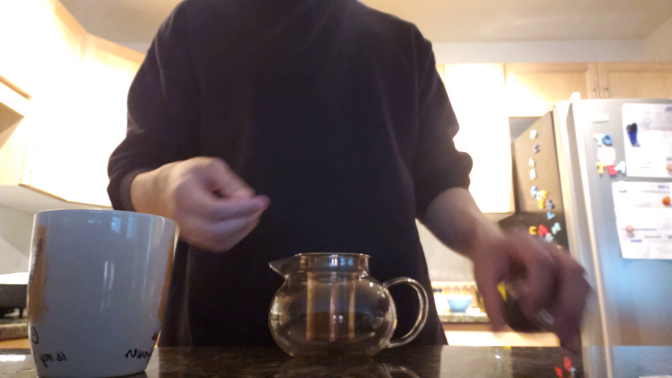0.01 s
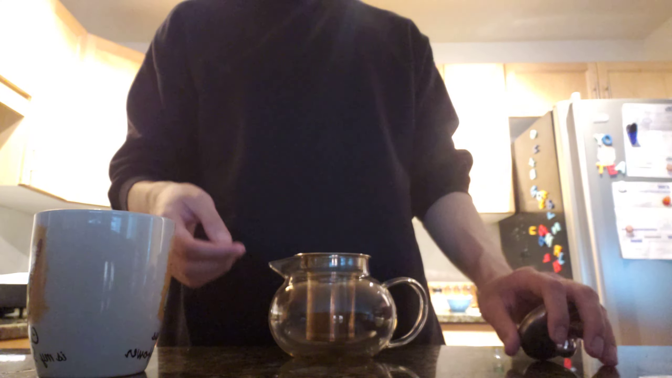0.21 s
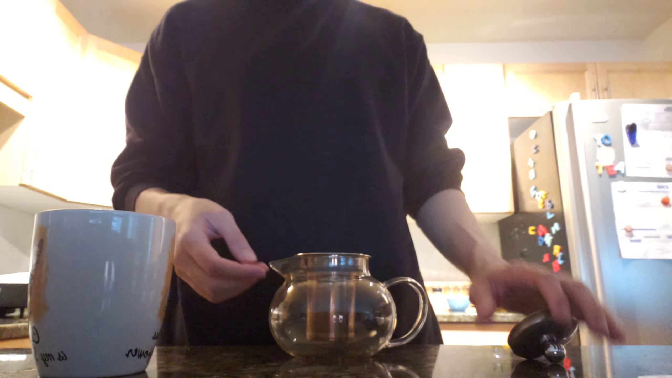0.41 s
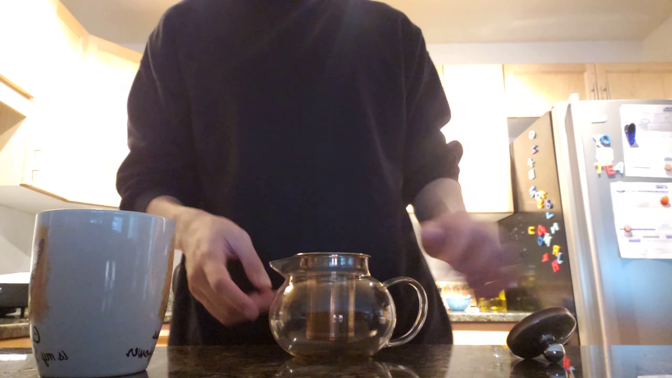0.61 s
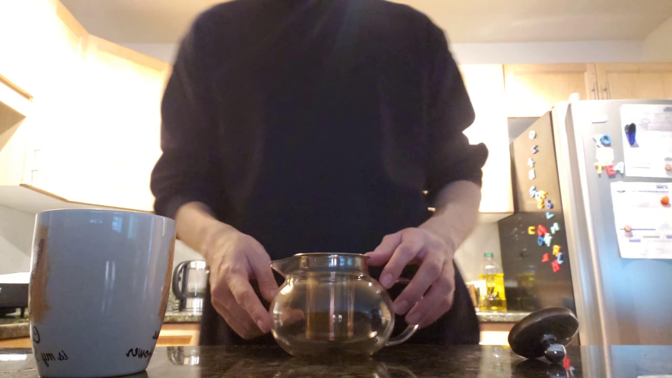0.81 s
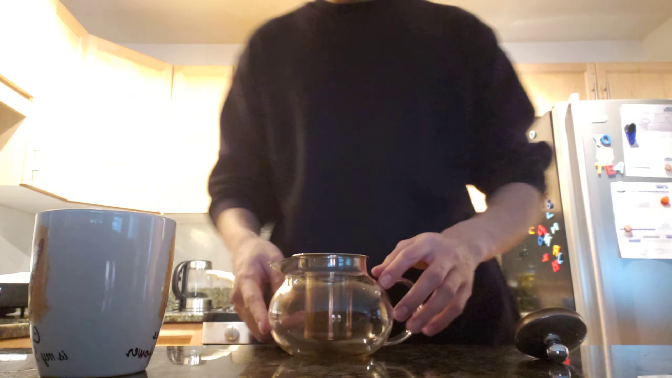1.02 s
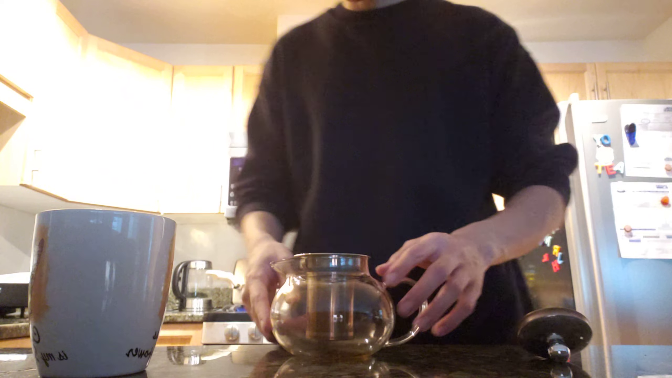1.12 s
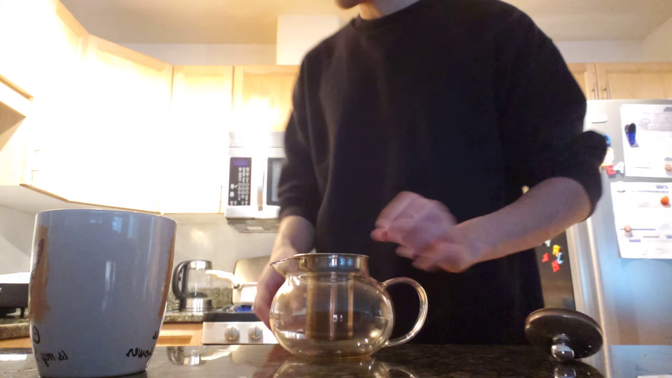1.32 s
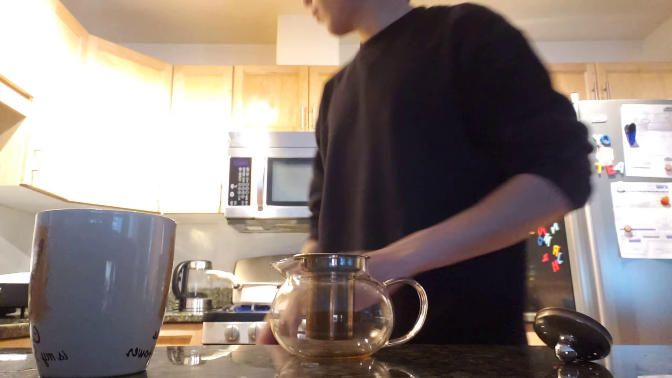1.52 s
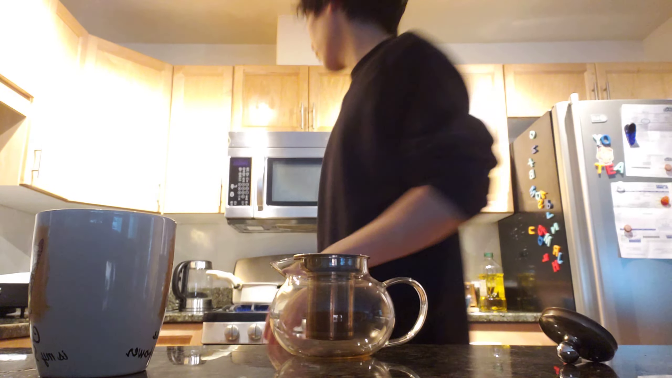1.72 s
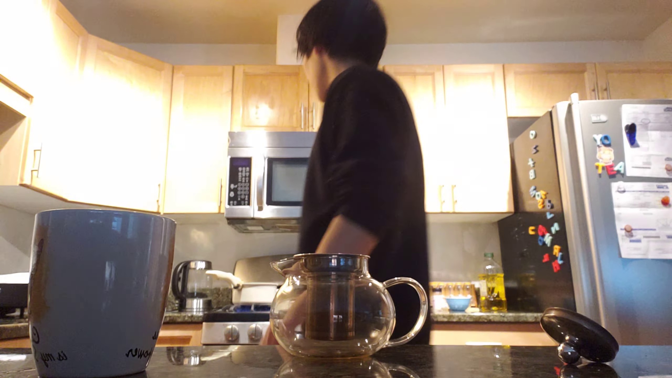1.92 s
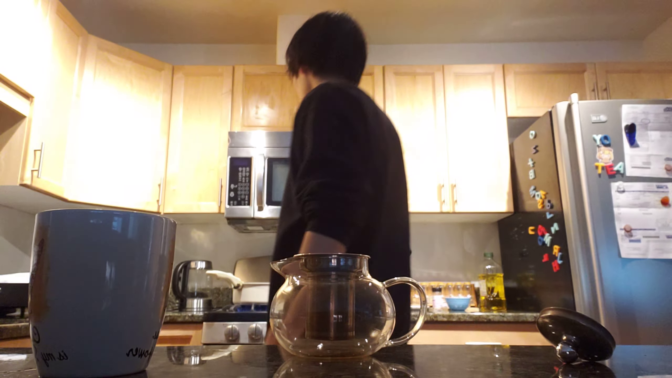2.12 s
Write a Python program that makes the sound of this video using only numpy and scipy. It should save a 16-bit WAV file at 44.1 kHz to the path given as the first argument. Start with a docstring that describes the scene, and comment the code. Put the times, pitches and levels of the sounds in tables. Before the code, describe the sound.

A teapot lid lands on a stone countertop, close to the microphone: a bright glass clink at 0.22 seconds, then a louder cluster of hard knocks and clinks at 0.36-0.38, with short kitchen reverberation and a faint rocking at 0.5. Much quieter footfalls and handling taps follow from 0.7, a dull heel thud at 0.92, and soft scuffs around 1.7-1.9, over a faint low appliance hum.

```python
"""Teapot lid on a stone countertop

A teapot lid is put down close by: its glass knob clinks, the rim knocks and chatters, and the lid
rocks to rest. Soft footfalls, scuffs and small handling taps follow as someone turns away, over a low hum.
Clinks and knocks are short clicks plus decaying tones; rocking, steps and taps are shaped noise, and one
heel also booms in decaying tones. The kitchen adds reverberation to the lid; the hum is noise plus tones."""
import sys
import numpy as np
from scipy import signal
from scipy.fft import rfft, irfft
from scipy.io import wavfile

SR = 44100
rng = np.random.default_rng(int(sys.argv[2]) if len(sys.argv) > 2 else 0)


def waveform_to_disk(signal):
    """Save audio, clipped to [-1, 1], as 16-bit WAV at the path in sys.argv[1]."""
    frames = np.transpose(np.atleast_2d(signal))
    scaled = np.clip(frames, -1, 1) * 32767
    samples = np.round(scaled).astype(np.int16)
    wavfile.write(sys.argv[1], SR, samples)


N = 97020  # length of the scene in samples
T = np.arange(N) / SR  # time [s]
HZ = np.fft.rfftfreq(2 * N, 1 / SR) + 1e-3  # frequency grid, nudged off zero so its log exists
NOISE_HZ = HZ[::2]  # coarser grid for sounds N samples long

LID_LAG_S, FAR_LAG_S = 0.00012, -.00029  # how far left arrives behind right
LID_PAN_DB, FAR_PAN_DB = 0.5, 3.5  # left minus right


def undb(db):
    """Turn decibels into gain."""
    return 10 ** (np.asarray(db) / 20)


def curve(points, hz=HZ):
    """Join (frequency, value) points by straight lines on a log-frequency axis."""
    p = np.array(points)
    return np.interp(np.log(hz), np.log(p[:, 0]), p[:, 1])


def pan(db):
    """Left and right gains that differ by this many decibels."""
    return undb(np.array([[db], [-db]]) / 2)


def fade(start, t60, rise):
    """Loudness that rises in a straight line, then loses 60 dB in every t60 seconds."""
    age = np.maximum(T - start, 0)
    decay = undb(-60 * np.maximum(age - rise, 0) / t60)
    return np.minimum(age / rise, 1) * decay


def ports(lag):
    """Phase turns that delay the left channel against the right."""
    return np.exp(-1j * np.pi * HZ * lag * np.array([[1], [-1]]))


def noise(gain, lag):
    """Stereo noise of unit rms with a given spectrum, more alike in both channels in the bass."""
    size = len(NOISE_HZ)
    z = rng.standard_normal((3, size)) + 1j * rng.standard_normal((3, size))
    alike = .92 / (1 + (NOISE_HZ / 1801) ** 2)  # shared part of the power
    shared = np.sqrt(alike) * z[0] * ports(lag)[:, ::2]
    separate = np.sqrt(1 - alike) * z[1:]
    x = irfft(gain[::2] * (shared + separate), N)
    return x / np.std(x)


def rub(spectrum, strokes, lag):
    """Noise that swells and fades with each (time, level, rise, t60) stroke; their powers add."""
    power = sum((undb(db) * fade(s, t60, rise)) ** 2 for s, db, rise, t60 in strokes)
    return noise(undb(curve(spectrum)), lag) * np.sqrt(power)


def click(points):
    """Spectrum of a unit-energy click: its energy comes as early as it can, then is faded fast."""
    # Folding the cepstrum forward in time makes the click start at once (minimum phase).
    cepstrum = irfft(np.log(undb(curve(points))))
    cepstrum[1:N] *= 2
    cepstrum[N + 1:] = 0
    click_t60_s = .004
    wave = irfft(np.exp(rfft(cepstrum)))[:N] * undb(-60 * T / click_t60_s)
    return rfft(wave / np.linalg.norm(wave), 2 * N)


def ring(modes):
    """Stereo spectrum of one second of decaying tones that build up while the surfaces touch."""
    contact_s = 0.00055
    t = T[:SR]
    onset = np.sin(np.pi / 2 * np.minimum(t / contact_s, 1)) ** 2
    tones = 0
    for hz, db, t60, side in modes:
        tones = tones + pan(side) * undb(db - 60 * t / t60) * np.sin(2 * np.pi * hz * t)
    return rfft(onset * tones, 2 * N)


def strike(response, blows, lag=LID_LAG_S):
    """Play a response at each (time, level) blow."""
    force = np.zeros(2 * N)
    for s, db in blows:
        force[int(s * SR)] += undb(db)
    return irfft(response * rfft(force) * ports(lag))[:, :N]


def knob():
    """Glass hitting stone: a tick, high ringing tones and a short bright splash of noise."""
    # Knob on stone: (time [s], level [dB], level of the bright splash [dB])
    clinks = [(.2234, -0.5, -31.5), (.3697, -3.5, -28), (.3762, -0.5, -28.5), (.3835, -6.5, -37)]
    # Ringing of the knob: (frequency [Hz], amplitude against the clink [dB], t60 [s], left minus right [dB])
    knob_modes = [(890, -55, .1, 3), (1350, -48, .025, 3), (1780, -43, .03, 5), (2790, -41, .025, 8),
                  (4225, -27, .035, -7), (4850, -23, .012, 2), (5230, -30, .025, 0), (10700, -19, .045, -5),
                  (11150, -25, .025, 0), (11590, -23, .04, -3), (10695, -27, .14, -2), (10845, -31, .16, 0),
                  (11540, -35, .16, 2), (12905, -40, .12, 6), (13730, -36, .11, 7), (14530, -36, .1, 6)]
    # Colour of the tick and splash: (frequency [Hz], relative level [dB])
    splash_colour = [(60, -40.5), (600, -22.5), (1800, -13.5), (3400, -9.5), (5200, -2), (6700, -12.5),
                     (7800, -17.5), (10000, -20.5), (10900, 5), (12200, -1.5), (14000, -1.5), (15500, -18)]
    tick_db, splash_t60_s, splash_pan_db = -9.5, .05, 11
    response = ring(knob_modes) + undb(tick_db) * click(splash_colour)
    clinking = strike(response, [(s, db) for s, db, _ in clinks])
    bursts = [(s, db, 1e-4, splash_t60_s) for s, _, db in clinks]
    return clinking + pan(splash_pan_db) * rub(splash_colour, bursts, LID_LAG_S)


def rim():
    """Each bounce of the rim cracks, shakes the counter as a burst of noise and rings the lid."""
    # Rim on stone: (time [s], crack level [dB], ring level [dB])
    knocks = [(.3609, -4, 0.5), (.368, -3, -12), (.3729, -10.5, -13), (.378, -9.5, -19),
              (.3838, -12.5, -20)]
    # Ringing of the lid: (frequency [Hz], amplitude against the ring level [dB], t60 [s], left minus right [dB])
    rim_modes = [(881.4, -30, 0.24, 4), (990, -31.5, 0.076, 2.5), (1260, -43, .12, 2), (1643, -35, 0.16, 3),
                 (1888, -33.5, .13, 4), (1985, -36.5, .08, 10.5), (2422, -37.5, 0.098, 2),
                 (2518, -40.5, 0.076, 4.5), (4230, -28.5, .1, 5), (4268, -10.5, 0.034, -10.5)]
    # Colour of the crack and counter: (frequency [Hz], relative level [dB])
    crack_colour = [(30, -43.5), (70, -33.5), (150, -22), (300, -3.5), (700, -2), (1900, 3), (2600, 6.5),
                    (3400, -18), (5200, -16), (7500, -29.5), (10000, -33.5), (14000, -31), (16000, -46.5)]
    body_db, body_t60_s = -27, 0.093  # counter noise; its level is against the crack level
    crack = strike(click(crack_colour), [(s, db) for s, db, _ in knocks])
    shakes = [(s, db, 1e-4, body_t60_s) for s, db, _ in knocks]
    body = undb(body_db) * rub(crack_colour, shakes, LID_LAG_S)
    ringing = strike(ring(rim_modes), [(s, db) for s, _, db in knocks])
    return pan(LID_PAN_DB) * (crack + body) + ringing


def rocking():
    """The lid rocks to rest: one soft swell of noise that fades."""
    # Rocking: (time [s], level [dB], rise [s], t60 [s])
    rocks = [(0.496, -50.5, 0.0306, 0.15)]
    # Colour of the rocking: (frequency [Hz], relative level [dB])
    rock_colour = [(100, -26), (300, -1.5), (600, 3.5), (900, 7.5), (1900, -11), (3000, -14), (7000, -26.5)]
    return pan(LID_PAN_DB) * rub(rock_colour, rocks, LID_LAG_S)


def steps():
    """Thuds of soft-edged noise, one firm heel that makes the floor boom, and soles that scuff."""
    # Footfalls: (time [s], level [dB], rise [s], t60 [s], upper edge [Hz])
    footfalls = [(0.686, -56, 0.007, 0.56, 390), (.87, -55, 0.0052, 0.36, 346),
                 (0.913, -47.5, 0.0053, 0.31, 310), (1.019, -58, 0.0042, 0.26, 505),
                 (1.675, -59, 0.015, 0.51, 240), (1.767, -52, 0.031, 0.26, 505)]
    # Colour of the thuds before the upper edge: (frequency [Hz], relative level [dB])
    step_colour = [(40, -19), (90, -21.5), (145, -0.5), (220, -10), (350, -7.5), (600, -8), (1000, -13.5),
                   (3000, -7), (6000, -17)]
    # Floor tones under the heel: (frequency [Hz], amplitude [dB], t60 [s], left minus right [dB])
    boards = [(126.6, -53, 0.43, 4.5), (149, -48.5, 0.26, 0.5), (209, -62.5, 0.2, -6),
              (360.5, -50, 0.24, 1)]
    # Soles scuffing in the turn: (time [s], level [dB], rise [s], t60 [s])
    scuffs = [(0.921, -63, 0.028, 0.85), (1.771, -55.5, 0.011, 0.37), (1.82, -50.5, 0.0042, 0.34),
              (1.893, -54, 0.025, 0.41)]
    # Colour of the scuffs: (frequency [Hz], relative level [dB])
    scuff_colour = [(60, -17.5), (200, -4), (400, -2.5), (650, 1.5), (1000, -4.5), (1600, -12.5),
                    (2500, -20), (3600, -17), (5000, -48), (9000, -56)]
    heel_s = .916
    floor = undb(curve(step_colour))
    thuds = 0
    for s, db, rise, t60, edge_hz in footfalls:
        dulled = floor / np.hypot(1, (HZ / edge_hz) ** 2)
        thuds = thuds + undb(db) * fade(s, t60, rise) * noise(dulled, FAR_LAG_S)
    boom = strike(ring(boards), [(heel_s, 0)], FAR_LAG_S)
    return boom + pan(FAR_PAN_DB) * (thuds + rub(scuff_colour, scuffs, FAR_LAG_S))


def handling():
    """Light taps are bursts of noise; faint clinks further off are narrow bands of noise."""
    # Handling taps: (time [s], level [dB], rise [s], t60 [s])
    taps = [(0.692, -52, 0.0094, 0.37), (.85, -74, 0.0093, 0.55), (.918, -74.5, 0.0074, 0.11),
            (1.022, -76.5, .008, 0.54), (1.14, -63.5, 0.019, 0.39), (1.678, -71.5, 0.022, 0.59),
            (1.775, -71, .01, 0.14), (1.912, -62, 0.012, 0.45)]
    # Colour of the taps: (frequency [Hz], relative level [dB])
    tap_colour = [(200, -16), (900, 1.5), (1500, -6), (2400, -1.5), (3000, -3.5), (3850, 6), (4700, -4.5),
                  (6300, -10.5), (8500, -25), (11500, -12.5), (15000, -37)]
    # Faint clinks: (time [s], level [dB], centre [Hz], width at half amplitude [Hz], t60 [s])
    tinks = [(1.679, -64, 4350, 333, 0.67), (2.036, -69.5, 11600, 2170, .45),
             (2.151, -78.5, 10800, 2620, 0.49)]
    tap_pan_db, tink_rise_s = 6.5, 0.012
    sound = rub(tap_colour, taps, FAR_LAG_S)
    for s, db, hz, width, t60 in tinks:
        band = 1 / (1 + (2 * (HZ - hz) / width) ** 2)
        sound = sound + undb(db) * fade(s, t60, tink_rise_s) * noise(band, FAR_LAG_S)
    return pan(tap_pan_db) * sound


def appliance():
    """A steady low rush of noise with a few steady motor tones."""
    # Colour of the rush: (frequency [Hz], relative level [dB])
    hum_colour = [(15, -51), (25, -26), (75, -19.5), (101, -9.5), (126, -13.5), (156, -4), (233, -9.5),
                  (281, -3), (322, -11), (359, -3), (421, -6.5), (495, -13), (614, -14.5), (871, -29),
                  (2360, -30.5), (8810, -44), (15500, -32.5)]
    # Motor tones: (frequency [Hz], rms level before panning [dB])
    motor_tones = [(160, -79), (272, -80.5), (350, -74), (414, -76), (530, -77.5)]
    rush_db, hum_pan_db = -64.5, 4
    hum = undb(rush_db) * noise(undb(curve(hum_colour)), FAR_LAG_S)
    for hz, db in motor_tones:
        # The square root of 2 turns rms into peak; each tone starts at a random phase.
        hum = hum + np.sqrt(2) * undb(db) * np.sin(2 * np.pi * (hz * T + rng.random()))
    return pan(hum_pan_db) * hum


def kitchen(x):
    """Diffuse reverberation: noise fading at its own rate in each band, convolved with the sound."""
    # Decay of each band: (centre [Hz], t60 [s]); a negative t60 makes that band grow instead,
    # so its energy comes so late that it is hardly heard before the end
    room_t60 = [(150, 1), (1000, 0.86), (2500, 0.5046), (4300, .5), (7000, 0.28), (11000, 0.36),
                (15000, -0.2)]
    # Colour of the reverberation: (frequency [Hz], gain before panning [dB])
    room_colour = [(100, -10.5), (500, -7), (1000, -18), (2500, -10.5), (3500, -9), (4300, -11.5),
                   (5400, -12.5), (7000, -3.5), (9500, -14), (11000, -7.5), (14000, -10)]
    onset_s, room_pan_db = .008, 5
    wash = rfft(noise(np.ones(len(HZ)), FAR_LAG_S))
    tail = 0
    for k, (_, t60) in enumerate(room_t60):
        # A band is 1 at its own centre and slopes to 0 at its neighbours.
        band = curve([(hz, float(j == k)) for j, (hz, _) in enumerate(room_t60)], NOISE_HZ)
        envelope = fade(0, t60, onset_s)
        tail = tail + irfft(wash * band, N) * envelope / np.linalg.norm(envelope)
    wet = irfft(rfft(x, 2 * N) * rfft(tail, 2 * N) * undb(curve(room_colour)))[:, :N]
    return pan(room_pan_db) * wet


def scene():
    """The lid with its treble cut at 14.7 kHz, its reverberation, the movements and the hum."""
    lid = knob() + rim() + rocking()
    lid = signal.sosfilt(signal.butter(12, 14700, fs=SR, output="sos"), lid)
    return lid + kitchen(lid) + steps() + handling() + appliance()


def record(dry):
    """The recorder cuts the top: a steep low-pass at 15.6 kHz."""
    return signal.sosfilt(signal.ellip(8, .2, 70, 15600, fs=SR, output="sos"), dry)


dry = scene()
out = record(dry)
waveform_to_disk(out)
```